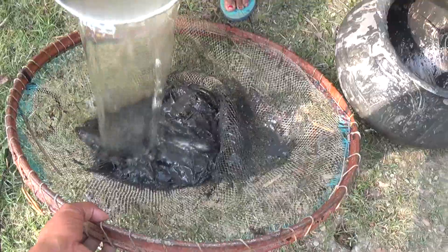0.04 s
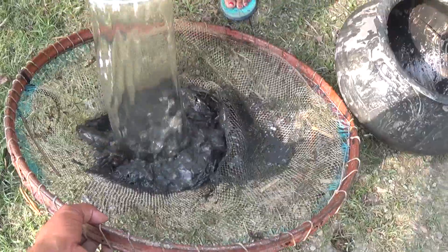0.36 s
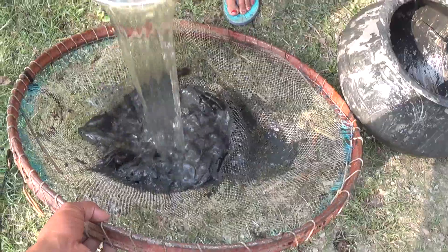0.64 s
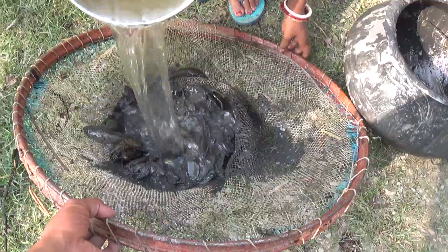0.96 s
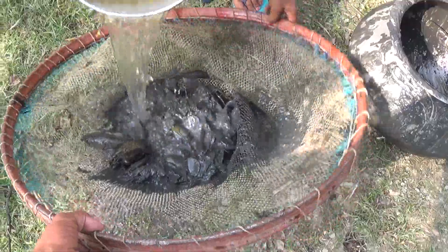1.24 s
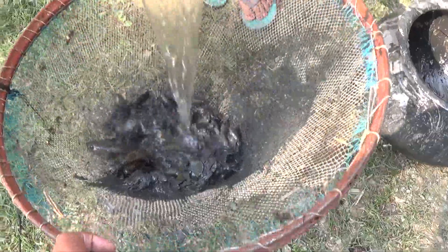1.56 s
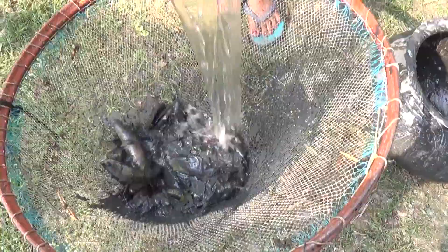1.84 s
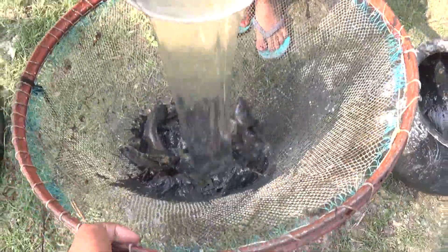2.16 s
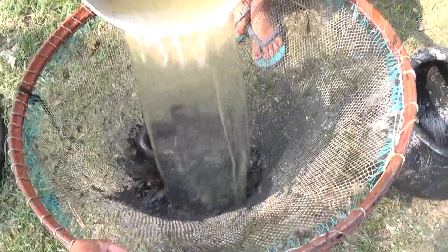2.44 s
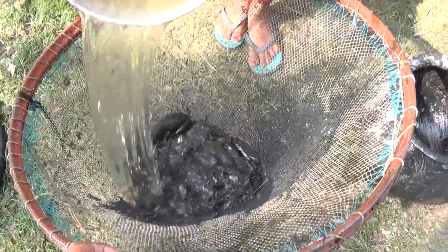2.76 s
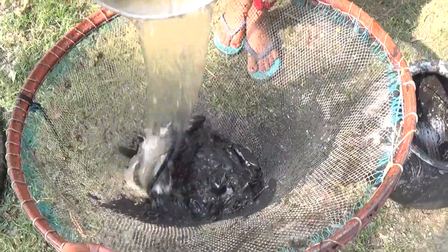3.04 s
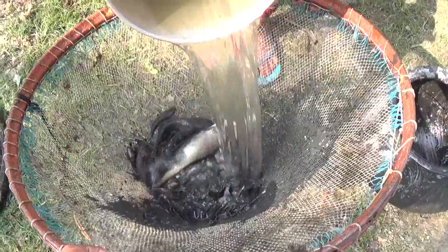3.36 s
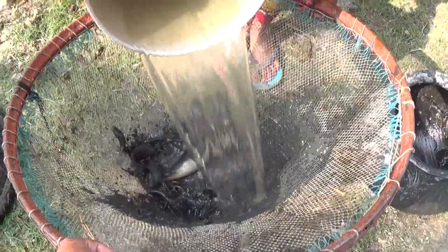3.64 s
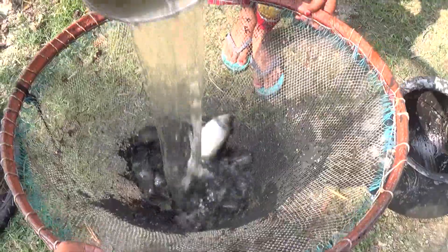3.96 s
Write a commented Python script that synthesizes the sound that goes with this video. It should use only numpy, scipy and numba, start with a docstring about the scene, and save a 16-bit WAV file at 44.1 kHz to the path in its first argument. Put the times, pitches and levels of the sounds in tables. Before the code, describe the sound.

Water pours steadily onto live fish in a net basket, splashing close by outdoors, with plinking drops and faint draining. From about 0.9 to 1.7 seconds the stream sputters as fish slap and squelch. The pour fills out near 2 seconds and its hiss jumps louder at 2.6. Two small gulps and more wet flaps come between 3 and 3.3 seconds, and heavy splashing continues until 4.

```python
"""Water poured onto live fish

Water falls from a pot onto fish in a net basket, close by and outdoors. The stream breaks into
splashes; each throws fine spray and traps bubbles that ring briefly, the smaller the higher.
Fish flap and squelch in the wet heap, single drops plink, and water drains through the net.
Two large air pockets gulp as the pour grows heavier."""
import sys
import numpy as np
from scipy import signal
from scipy.fft import rfft, irfft
from scipy.io import wavfile
from scipy.ndimage import uniform_filter1d
from numba import njit

SR = 44100
rng = np.random.default_rng(int(sys.argv[2]) if len(sys.argv) > 2 else 0)


def store_pcm(level_fs):
    """Save levels as 16-bit WAV."""
    pcm = np.round(np.clip(level_fs, -1, 1) * 32767).astype(np.int16)
    wavfile.write(sys.argv[1], SR, np.atleast_2d(pcm).T)


N = 176400
T = np.arange(N) / SR
FREQ = np.maximum(np.fft.rfftfreq(N, 1 / SR), 1)

# Spectrum of splashing water: f/Hz, gain/dB
SPLASH_SPECTRUM = [(180, -52), (300, -15), (526, -10.5), (708, -7.5), (907, -6), (1160, -1.5), (1540, -2),
                   (1750, -1), (3810, -2), (5130, -8), (10100, -2.5), (11300, -5), (13400, -16),
                   (15500, -18)]
SHARP_ATTACK, PLINK_ATTACK, SOFT_ATTACK = 0.2, 1.77, 2.5  # cycles
PLINK_RISE = 0.044  # fraction of the starting pitch


def undb(db):
    """Amplitude ratio of a level in decibels."""
    return 10 ** (np.asarray(db) / 20)


def unit(x):
    """Normalisation to rms 1."""
    return x / np.sqrt(np.mean(x ** 2))


def envelope(table, column=1):
    """Gain from a column of levels, interpolated linearly in dB over time."""
    rows = np.array(table)
    return undb(np.interp(T, rows[:, 0], rows[:, column]))


def colour(x, points):
    """Zero-phase filtering through points of f/Hz, gain/dB."""
    hz, db = np.array(points, float).T
    return irfft(rfft(x) * undb(np.interp(np.log(FREQ), np.log(hz), db)), N)


def wet(x):
    """Spectral shaping to the colour of splashing, at rms 1."""
    return unit(colour(x, SPLASH_SPECTRUM))


def noise_band(hz, octaves):
    """Noise under a Gaussian band in log frequency, at rms 1."""
    band = np.exp(-.5 * (np.log2(FREQ / hz) / octaves) ** 2)
    return unit(irfft(rfft(rng.standard_normal(N)) * band, N))


def steady(x):
    """Division by the running rms evens out slow changes of level."""
    window = int(0.084 * SR)
    return x / np.sqrt(uniform_filter1d(uniform_filter1d(x ** 2, window), window) + 1e-18)


@njit
def ring(start, hz, cycles, size, rise, attack):
    """Bubbles as damped oscillators: each swells, rises in pitch and decays 50 dB over its cycles."""
    out = np.zeros(N)
    for k in range(len(start)):
        first, length = int(start[k] * SR), cycles[k] * SR / hz[k]
        level, fade = size[k], np.exp(-5.8 / length)
        onset, onset_fade = 1., np.exp(-hz[k] / (SR * attack))
        phase = 0.
        for i in range(min(int(length), N - first)):
            phase += 2 * np.pi * hz[k] * (1 + rise * i / length) / SR
            out[first + i] += level * (1 - onset) * np.sin(phase)
            level *= fade
            onset *= onset_fade
    return out


def bubbles(band, count, cycles, spread_db, rise, splashes=None, attack=SHARP_ATTACK):
    """Superposition of bubbles of one size range, excited at random times or just after splashes."""
    pick, pitch, wait = rng.random((count, 3)).T
    size, length, sign = np.clip(rng.standard_normal((count, 3)).T, -2.2, 2.2)
    start, db = pick * N / SR, spread_db * size
    if splashes is not None:
        splash_s, splash_db = splashes
        parent = (pick * len(splash_s)).astype(int)
        start = splash_s[parent] - .0016 * np.log(1 - wait)  # mean delay 1.6 ms
        db = db + splash_db[parent]
    hz = band[0] * (band[1] / band[0]) ** pitch
    gain = np.sign(sign) * hz / band[1] * undb(db)
    return ring(start, hz, cycles * np.exp(.4 * length), gain, float(rise), attack)


def basket_rubs():
    """Friction of the shifting net and basket gives dull swells of noise."""
    # t/s, duration/s, peak level/dB, centre f/Hz
    rubs = [(0.93, 0.13, -65, 130), (1.12, .2, -54.5, 141)]
    out = np.zeros(N)
    for start, length, db, hz in rubs:
        arch = np.sin(np.pi * np.clip((T - start) / length, 0, 1))
        out += undb(db) * arch * noise_band(hz, octaves=0.36)
    return out


def drain():
    """Water runs through the net to the ground: large bubbles resonate over a soft rumble."""
    # Draining flow: t/s, relative level/dB
    flow = [(0, -55.5), (0.4, -66), (0.65, -61), (1.0, -56.5), (1.35, -56.5), (1.7, -61), (2.35, -65.5),
            (2.95, -58), (3.25, -58.5), (4, -62)]
    # Its spectrum: f/Hz, gain/dB
    spectrum = [(25, -26), (60, -13), (130, -7.5), (190, -9), (270, -5), (380, -8.5), (520, -8), (800, -15)]
    gurgle = unit(colour(bubbles((210, 620), count=900, cycles=18, spread_db=6, rise=0.11), spectrum))
    rumble = unit(colour(rng.standard_normal(N), spectrum))
    return unit(gurgle + undb(1) * rumble) * envelope(flow) * undb(6.5)


def gulps():
    """Resonance of air pockets between the fish: each swells, rings unsteadily and rises in pitch."""
    # t/s, level/dB, starting f/Hz, glide/(Hz/s), swell/s, decay/s
    pockets = [(3.042, -27.5, 337, 220, 0.029, 0.036), (3.307, -39, 319, 1330, 0.0089, 0.054)]
    out = np.zeros(N)
    for start, db, hz, glide, swell, decay in pockets:
        age = np.maximum(T - start, 0)
        shape = np.minimum(age / swell, 1) * np.exp(-np.maximum(age - swell, 0) / decay)
        wobble = 0.17 * noise_band(44, octaves=0.78)
        phase = 2 * np.pi * (hz * age + .5 * glide * age ** 2)
        out += undb(db) * shape * (1 + wobble) * np.sin(phase + wobble)
    return out


def squelches():
    """A gap between fish sheds bubbles of like size; their resonance slides as it opens or closes."""
    # t/s, duration/s, level/dB, starting f/Hz, final f/Hz
    squeezes = [(0.889, 0.067, -36, 2320, 2350), (0.935, 0.04, -33, 1760, 1040),
                (0.977, 0.089, -36, 1260, 1100), (1.5, 0.037, -36, 1100, 1230),
                (1.675, 0.016, -31.5, 1700, 2450), (1.713, 0.021, -30.5, 1700, 1790),
                (2.2, 0.55, -47, 697, 712), (3.044, 0.04, -26.5, 3120, 3150),
                (3.154, 0.03, -28, 2330, 1750), (3.255, 0.012, -28, 1510, 1310),
                (3.295, 0.027, -27, 2650, 1600)]
    out, count = np.zeros(N), 80
    cycles = np.full(count, 18.)
    for start, length, db, from_hz, to_hz in squeezes:
        progress = (np.arange(count) + rng.random(count)) / count
        detune, size = rng.standard_normal((count, 2)).T
        hz = from_hz * (to_hz / from_hz) ** progress * np.exp(0.07 * detune)
        swell = np.sqrt(np.sin(np.pi * progress))
        rush = ring(start + length * progress, hz, cycles, size * swell, PLINK_RISE, PLINK_ATTACK)
        out += undb(db) * unit(rush) * np.sqrt(length * SR / N)
    return out


def slaps():
    """Impacts of fish and lumps of water excite broadband spray over a dull thud of the heap."""
    # t/s, spray level/dB, decay/s, band centre f/Hz before colouring, thud level/dB
    impacts = [(0.933, -21, 0.0045, 2300, -62), (1.144, -21, .003, 8000, -63),
               (1.304, -19, 0.006, 15000, -73), (1.469, -20, 0.013, 1400, -33.5),
               (1.484, -21, 0.0035, 8000, -50), (1.631, -24, 0.0069, 3000, -59),
               (1.721, -14, .003, 8000, -65), (2.196, -19, 0.012, 3000, -65),
               (2.59, -12.5, 0.0028, 6000, -52), (2.925, -24, 0.0052, 8000, -67),
               (3.04, -17.5, .012, 3500, -50), (3.158, -21, .02, 2500, -60)]
    out, attack_s = np.zeros(N), 0.00034
    thud = noise_band(420, octaves=0.85)
    for start, db, decay, hz, thud_db in impacts:
        age = np.maximum(T - start, 0)
        shape = (1 - np.exp(-age / attack_s)) * np.exp(-age / decay)
        spray = wet(noise_band(hz, octaves=1.84))
        out += shape * (undb(db) * spray + undb(thud_db) * thud)
    return out


def plinks():
    """Air entrainment by single drops: each knocks briefly and traps a bubble that rings clearly."""
    # t/s, relative level/dB, f/Hz
    drops = [(0.056, -17, 2660), (0.357, -16, 2420), (0.42, -18, 1800), (0.484, -7, 8440),
             (0.526, -20, 3000), (0.61, -11, 8300), (0.649, -14, 2720), (0.79, -19, 1770),
             (0.832, -13, 4950), (0.933, -15, 3130), (0.937, -14.5, 2270), (0.996, -13.5, 3830),
             (1.017, -17.5, 1910), (1.031, -18.5, 1180), (1.051, -17, 2730), (1.063, -17, 1740),
             (1.16, -15.5, 2900), (1.452, -19.5, 2300), (1.471, -17, 1790), (1.514, -19.5, 1100),
             (1.628, -22.5, 1270), (2.012, -10, 3620), (2.195, -23, 1500), (2.487, -15.5, 3350),
             (2.502, -20, 720), (2.62, -12, 3750), (3.004, -8.5, 3660), (3.006, -22.5, 657),
             (3.098, -11.5, 3210), (3.344, -11.5, 3700), (3.514, -3, 8100), (3.567, -13.5, 3180)]
    start, db, hz = np.array(drops, float).T
    size = undb(db + 7)
    knock_cycles, bubble_cycles = np.full(len(hz), 3.8), np.full(len(hz), 17.4)
    knock = ring(start, hz, knock_cycles, undb(-6.5) * size, 0., SHARP_ATTACK)
    bubble = ring(start, hz, bubble_cycles, size, PLINK_RISE, PLINK_ATTACK)
    return colour(knock, SPLASH_SPECTRUM) + bubble


def pour():
    """Bubble resonances sum to an even seething; breakup of the stream adds bursts, ticks and plips."""
    # The pour, its hiss suddenly louder at 2.59 s: t/s, level/dB of spray, small and large bubbles
    flow = [(0.0, -33.5, -32.5, -35.5), (0.06, -29.0, -29, -42.5), (0.15, -32, -36, -41),
            (0.27, -30, -32.5, -42.5), (0.4, -27.5, -31, -37.5), (0.5, -28, -33, -41),
            (0.58, -28.5, -30, -36.5), (0.66, -29.0, -25.5, -34), (0.72, -28, -31, -39.5),
            (0.78, -27.5, -29, -36), (0.87, -32, -35.5, -43), (0.97, -33.5, -32.5, -31.5),
            (1.03, -27.5, -26.5, -35), (1.12, -28, -29, -40), (1.27, -32.0, -31.5, -41),
            (1.33, -33.0, -33.5, -39), (1.45, -35.5, -35, -46), (1.49, -27, -29, -36.5),
            (1.58, -28.5, -32, -43), (1.64, -25, -30.5, -39.5), (1.7, -31, -34.5, -53),
            (1.8, -26.5, -30.5, -43.5), (1.95, -24, -25.0, -40), (2.03, -25.5, -25.5, -35),
            (2.12, -28, -28.5, -34.5), (2.22, -26, -30, -38.5), (2.33, -26, -30.5, -42),
            (2.42, -30, -30.5, -45), (2.585, -27.5, -31.5, -40), (2.597, -22.0, -28.5, -44.5),
            (2.79, -21, -23.5, -29), (2.88, -23.5, -28.5, -34.5), (3.0, -22, -25.5, -29),
            (3.1, -23, -24.5, -32.5), (3.125, -24.5, -32, -36), (3.145, -22.5, -30, -29),
            (3.17, -22, -25, -29.5), (3.32, -25, -25.5, -31), (3.42, -26, -28.0, -36.5),
            (3.64, -26, -30, -39.0), (3.75, -22, -28, -39.5), (3.9, -20.5, -24.5, -38),
            (4.0, -22, -23.5, -28)]
    # Sputtering early, a full sheet later: t/s, gain/dB of bursts, ticks and plips
    sputter = [(0, 0.5), (0.7, 0.5), (1.35, 4.5), (1.75, 5.5), (1.95, -2.5), (2.5, 0.5), (2.7, -3),
               (3.3, -0.5), (4, -1.5)]
    breakup = envelope(sputter)
    spray_hz, small_hz, large_hz = (5000, 16000), (1600, 5000), (560, 1600)
    splash_count = 110 * N // SR
    splash_s = rng.random(splash_count) * N / SR
    splash_db = 3 * np.clip(rng.standard_normal(splash_count), -2, 2)
    splashes = splash_s, splash_db

    seething = bubbles(spray_hz, count=50000, cycles=10.5, spread_db=3, rise=0.028)
    bursts = bubbles(spray_hz, count=9000, cycles=17, spread_db=5, rise=0.028, splashes=splashes)
    ticks = bubbles(spray_hz, count=220, cycles=3, spread_db=4, rise=0)
    plips = bubbles(spray_hz, count=700, cycles=52, spread_db=4, rise=0.046, attack=SOFT_ATTACK)
    spatter = undb(-4.5) * wet(bursts) + undb(-11.5) * wet(ticks) + undb(-7.5) * wet(plips)
    spray = steady(wet(seething) + breakup * spatter) * envelope(flow, column=1)

    seething = bubbles(small_hz, count=13000, cycles=20.3, spread_db=1.7, rise=0.13)
    bursts = bubbles(small_hz, count=4000, cycles=7.4, spread_db=5.5, rise=0.15, splashes=splashes)
    plips = bubbles(small_hz, count=400, cycles=33, spread_db=2.5, rise=0.05, attack=SOFT_ATTACK)
    spatter = undb(-5) * wet(bursts) + undb(-5.5) * wet(plips)
    small = steady(wet(seething) + breakup * spatter) * envelope(flow, column=2)

    seething = bubbles(large_hz, count=2800, cycles=21.3, spread_db=2.5, rise=0.16)
    bursts = bubbles(large_hz, count=1200, cycles=5.3, spread_db=4.5, rise=0.21, splashes=splashes)
    plips = bubbles(large_hz, count=170, cycles=19, spread_db=2, rise=0.076, attack=SOFT_ATTACK)
    spatter = undb(-7) * wet(bursts) + undb(-5.5) * wet(plips)
    large = steady(wet(seething) + breakup * spatter) * envelope(flow, column=3)
    return spray + small + large


def scene():
    """Direct sound comes from almost straight ahead; ground and basket scatter a little to the sides."""
    # Scattered sound: f/Hz, side level/dB relative to mid
    width = [(60, -37), (120, -34), (220, -37), (700, -21.5), (1300, -22), (2000, -17), (2700, -19.5),
             (4600, -11.5), (6500, -19), (7800, -24), (11000, -30.5), (12000, -62)]
    # Direct sound: f/Hz, left level/dB relative to right
    balance = [(60, 0), (600, 0.1), (1200, 0), (4400, 1), (8000, 0)]
    mid = pour() + drain() + squelches() + plinks() + slaps() + gulps() + basket_rubs()
    scatter = rfft(rng.standard_normal(N) * np.exp(-T / .02))
    diffuse = irfft(rfft(mid) * scatter / np.abs(scatter), N)  # all-pass: only the phase changes
    side = colour(diffuse, width)
    left = colour(mid, [(hz, db / 2) for hz, db in balance])
    right = colour(mid, [(hz, -db / 2) for hz, db in balance])
    return np.array([left + side, right - side])


def record(dry):
    """Soft saturation rounds the loudest peaks; a steep low-pass removes the highest treble."""
    ceiling, cutoff_hz = 0.75, 15650
    lowpass = signal.ellip(10, .2, 80, cutoff_hz, fs=SR, output="sos")
    return signal.sosfilt(lowpass, ceiling * np.tanh(dry / ceiling))


dry = scene()
out = record(dry)
store_pcm(out)
```